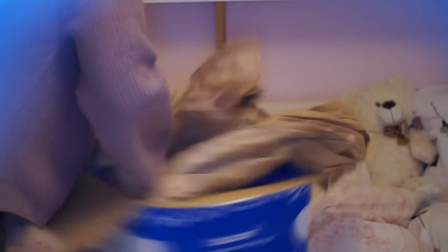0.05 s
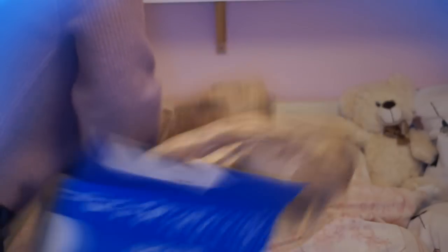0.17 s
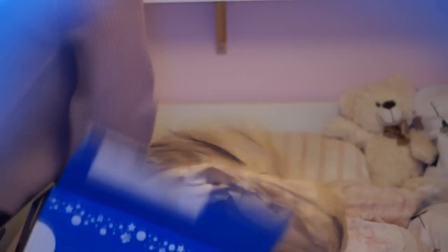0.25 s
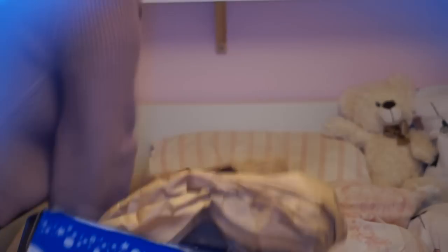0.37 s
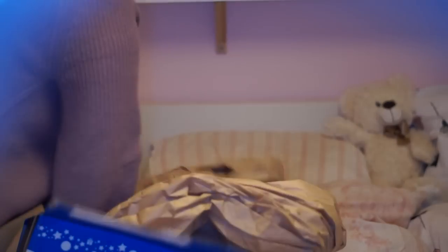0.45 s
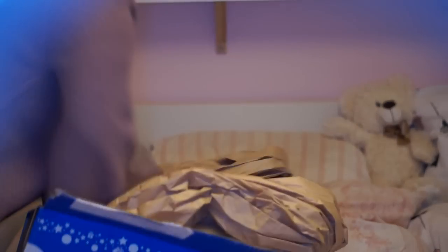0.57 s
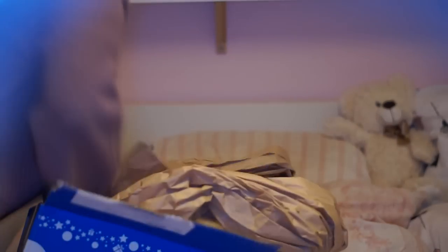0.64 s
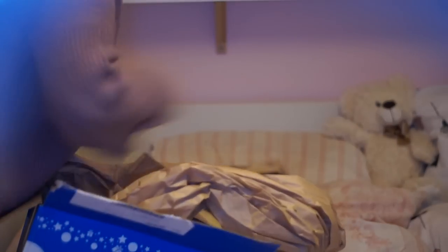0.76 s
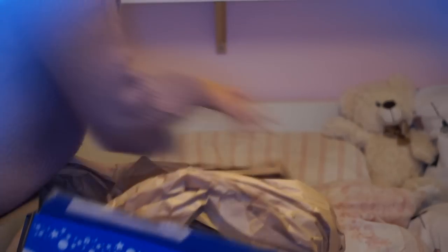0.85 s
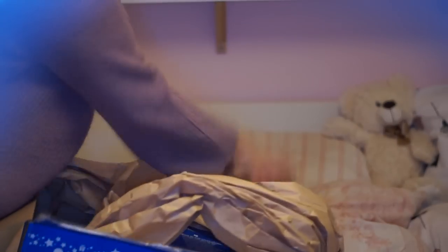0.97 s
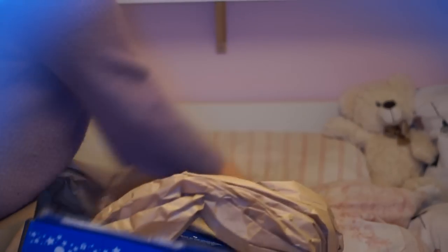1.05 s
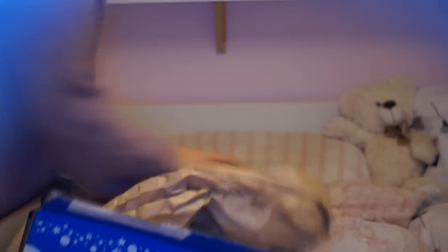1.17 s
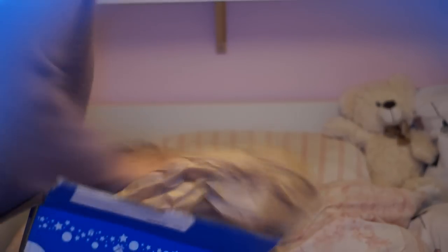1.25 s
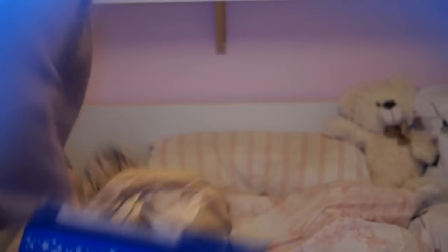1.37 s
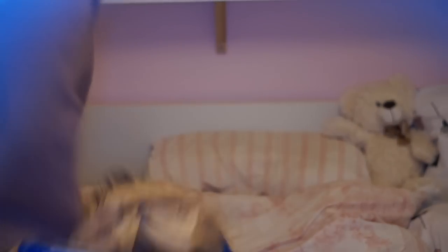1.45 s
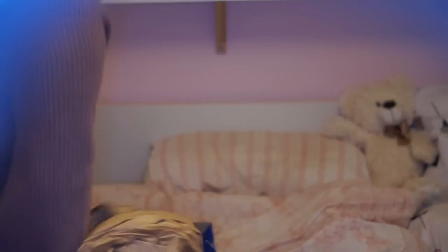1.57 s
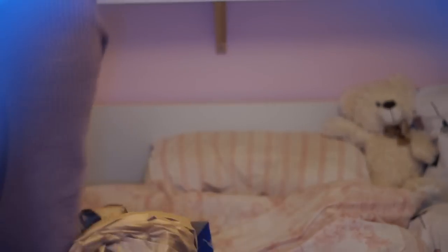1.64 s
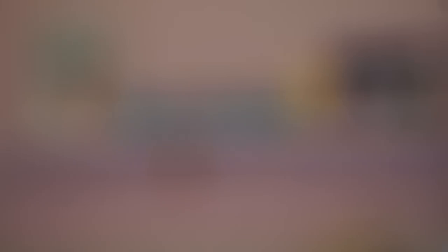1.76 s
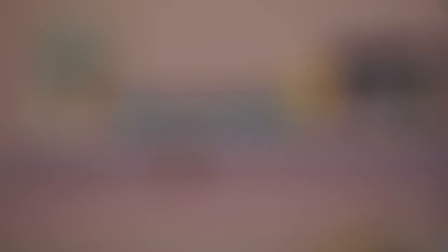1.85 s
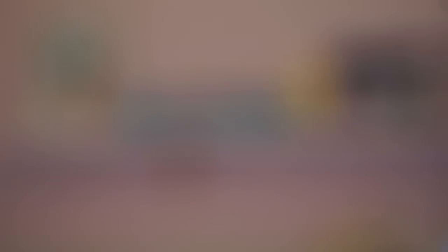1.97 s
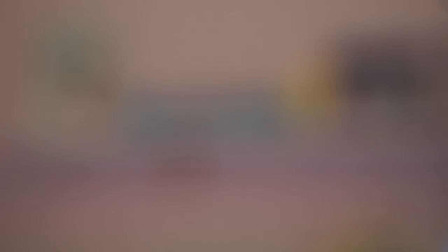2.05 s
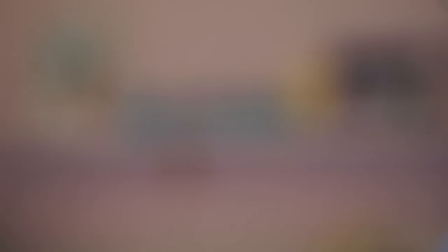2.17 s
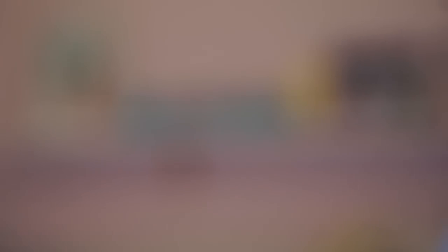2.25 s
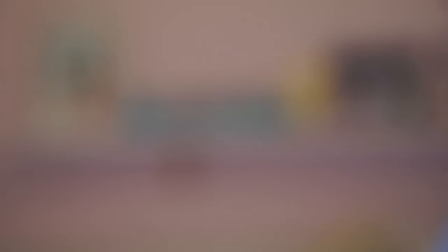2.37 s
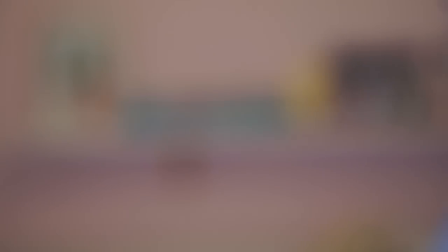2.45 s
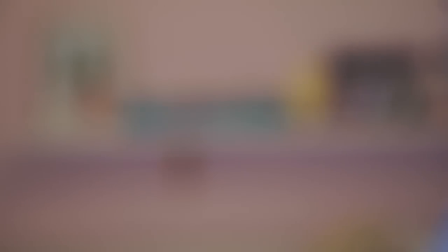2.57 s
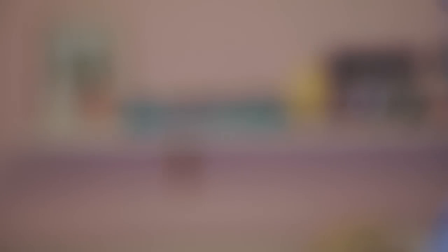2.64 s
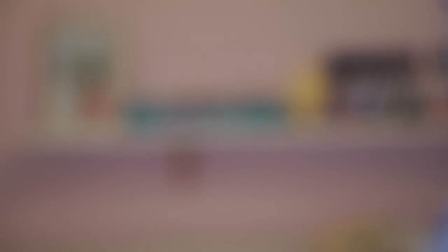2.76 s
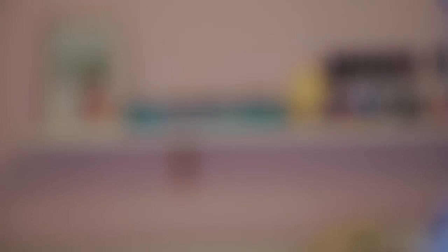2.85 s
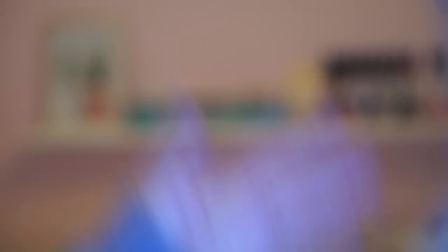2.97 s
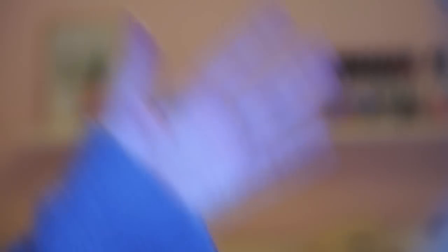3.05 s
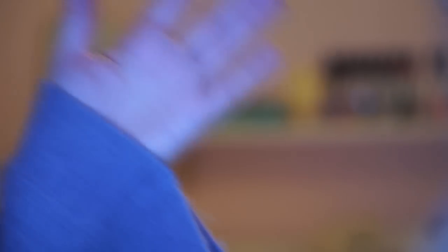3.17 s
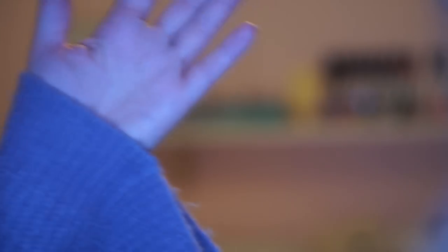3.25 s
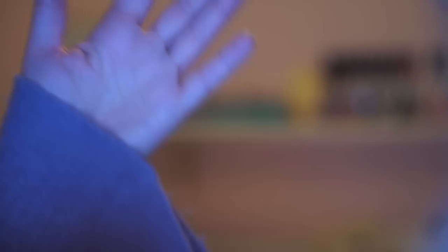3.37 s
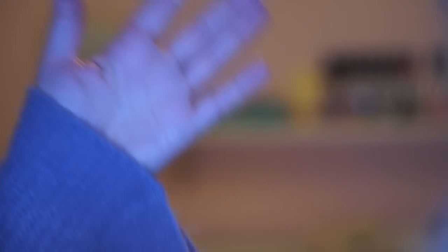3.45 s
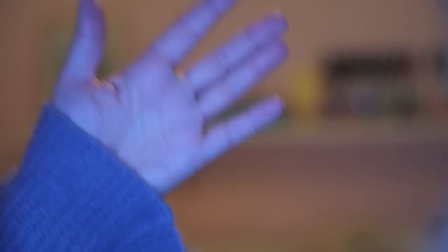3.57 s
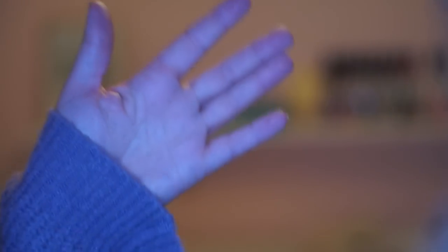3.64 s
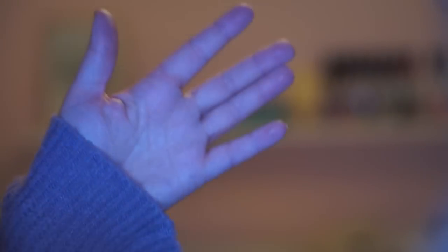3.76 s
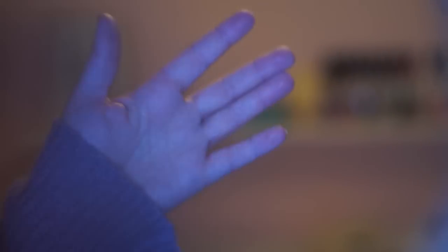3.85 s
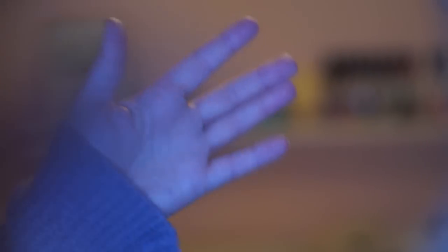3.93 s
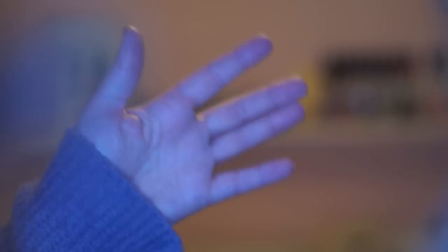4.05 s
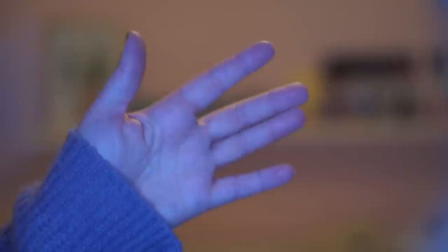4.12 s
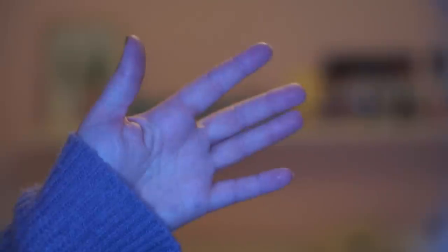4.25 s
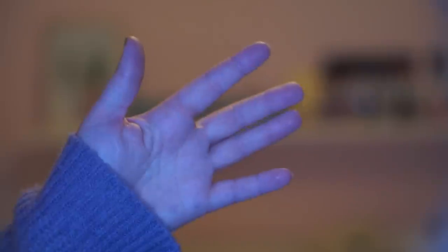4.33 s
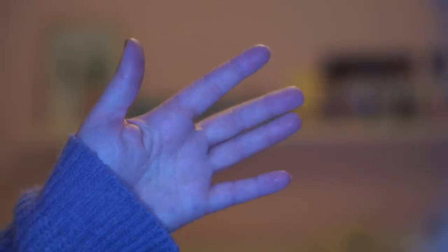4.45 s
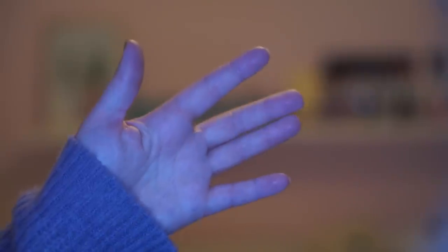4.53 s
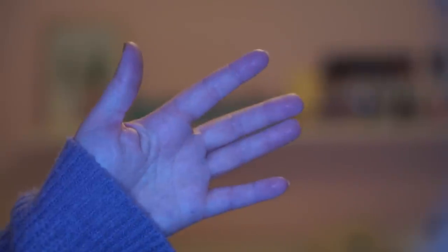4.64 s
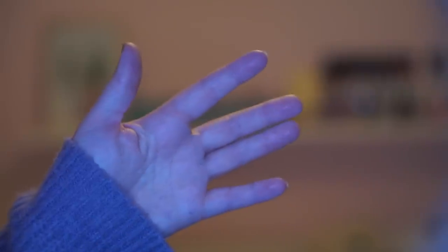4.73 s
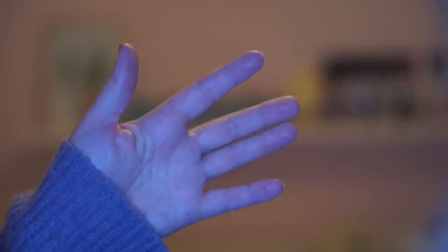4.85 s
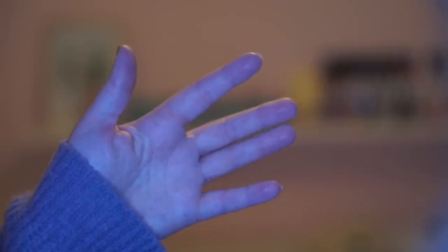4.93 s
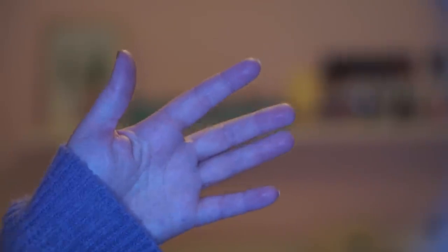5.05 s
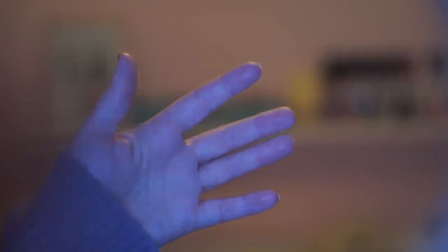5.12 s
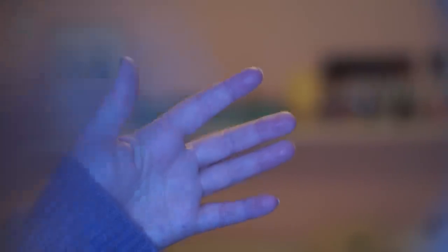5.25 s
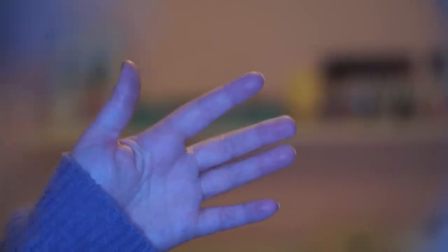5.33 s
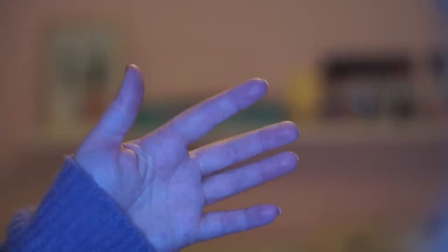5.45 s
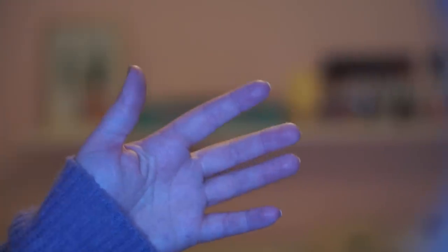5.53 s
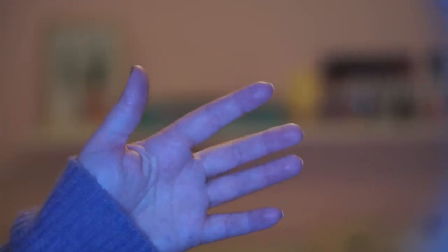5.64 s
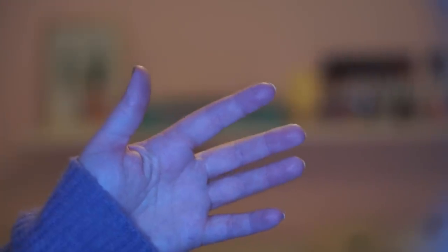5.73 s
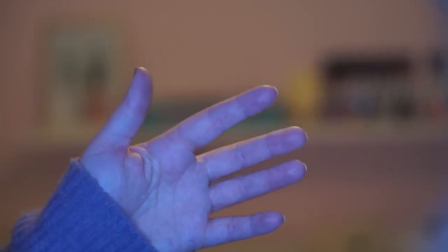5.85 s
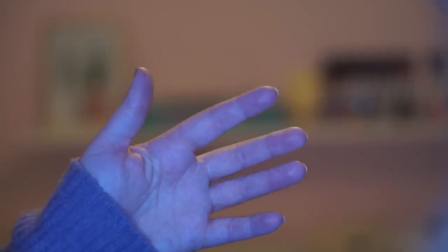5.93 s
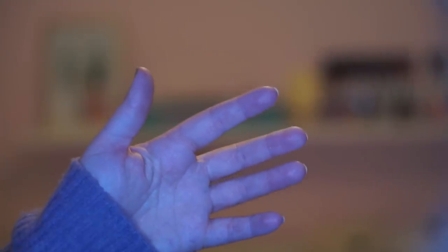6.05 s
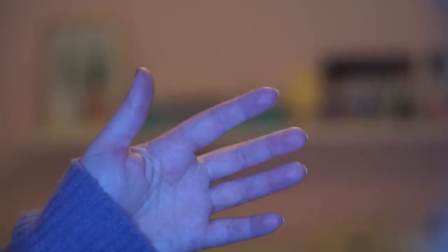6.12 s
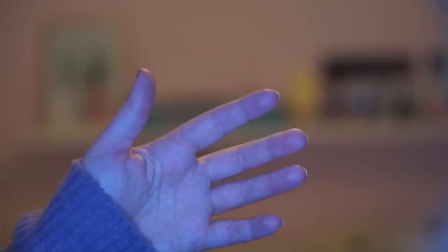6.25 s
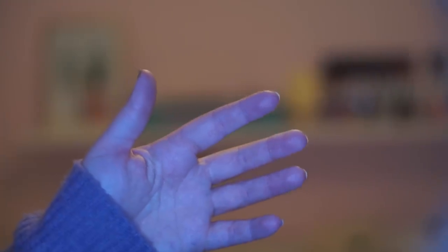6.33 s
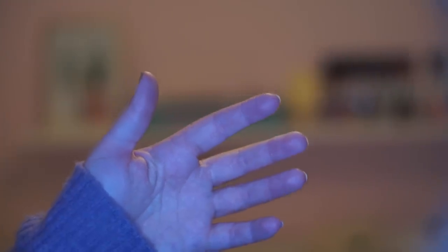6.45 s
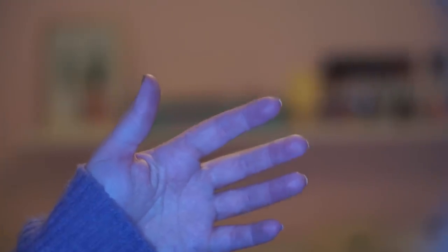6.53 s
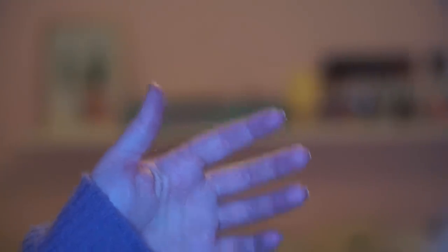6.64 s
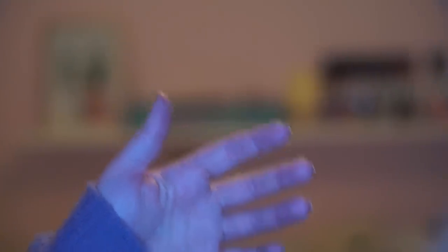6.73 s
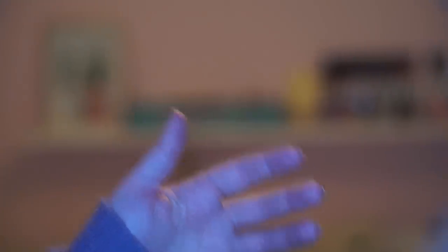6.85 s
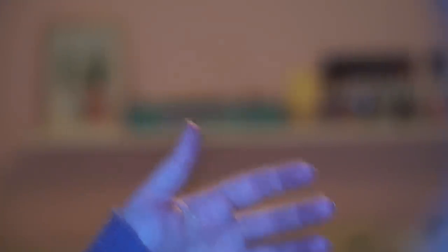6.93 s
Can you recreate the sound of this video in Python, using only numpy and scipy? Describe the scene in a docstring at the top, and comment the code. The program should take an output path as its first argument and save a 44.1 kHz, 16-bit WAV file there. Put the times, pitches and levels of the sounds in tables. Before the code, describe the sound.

From the start, stiff packing paper is pushed about in a cardboard box, close and loud: dense, grainy crackling with crisp snaps, strongest until about 0.3 s. At 0.35 s the box lands with a short, dull, hollow bump. The rustling then eases into smaller crackles, with brief pushes around 0.7 s and a near lull at 0.9 s, before swelling into heavy crunches at 1.2 to 1.6 s. At 1.7 s it is cut dead. Only faint, steady room air with a soft whirr remains, far quieter. Tiny double plastic ticks follow at about 1.75, 2.2, 2.8 and 3.1 s, clearer at 3.85 s and clearest at 6.1 s. Light, raspy finger strokes on the camera shell come at 2.4 to 2.9, 3.4 to 3.8, 4.2 to 4.8 and 5.5 to 6.8 s, with barely audible muffled shuffles near 3, 4, 5.2 and 6.7 s.

```python
"""In a small room, crumpled packing paper is shoved about in a cardboard box: clumps of clicks make the rustle,
short noise bursts the snapping folds. The box lands once with a dull bump, made of ringing panels.
The rustle is cut short. Fingers then rub and tick on a camera: strokes swell a stream of tiny slips,
and double ticks ring its plastic shell. Faint room tone, filtered noise with a soft whirr, runs throughout,
with a few muffled noise swells later on."""
import sys
import numpy as np
from scipy import signal
from scipy.fft import rfft, irfft
from scipy.io import wavfile
from scipy.ndimage import uniform_filter1d

SR = 44100
rng = np.random.default_rng(int(sys.argv[2]) if len(sys.argv) > 2 else 0)


def wav_record(signal):
    """Record a signal, one row per channel, as 16-bit PCM in the file named by sys.argv[1]."""
    frames = np.transpose(np.atleast_2d(signal))
    bounded = np.clip(frames, -1, 1)
    # unit amplitude maps onto the largest positive 16-bit level
    quanta = np.round(bounded * 32767).astype(np.int16)
    wavfile.write(sys.argv[1], SR, quanta)


N = 308300  # samples
T = np.arange(N) / SR  # seconds
HZ = np.fft.rfftfreq(N, 1 / SR)


def amp(db):
    """Turns decibels into a gain."""
    return 10 ** (np.asarray(db) / 20)


def unit(x):
    """Scales a sound to an rms of 1."""
    return x / np.sqrt(np.mean(x ** 2) + 1e-20)


def read(points, hz):
    """Reads a table between its points, on a log-frequency axis."""
    f, value = np.transpose(points)
    return np.interp(np.log(hz + 1), np.log(f + 1), value)


def add(mix, s, sound):
    """Mixes a stereo sound in at time s (seconds)."""
    part = mix[:, max(round(s * SR), 0):][:, :sound.shape[1]]
    part += sound[:, :part.shape[1]]


def colour(x, gain):
    """Filters by one gain per frequency, then scales to an rms of 1."""
    return unit(irfft(rfft(x) * gain, x.shape[-1]))


def ring(x, hz, width):
    """Passes a sound through one resonance with a gain of 1 at its peak."""
    return signal.lfilter(*signal.iirpeak(min(hz, SR / 3), hz / min(width, SR / 3), SR), x)


def struck(t, hz, width):
    """One struck mode: a sine that dies away, faster for a wider resonance."""
    return np.exp(-np.pi * width * t) * np.sin(2 * np.pi * hz * t)


def above(x, hz):
    """Steep high-pass: small things radiate no deep bass."""
    return signal.sosfilt(signal.butter(3, hz, "high", fs=SR, output="sos"), x)


def paired(x, likeness):
    """Blends two unrelated channels until they are as alike as a close pair of microphones hears them."""
    a, b = rfft(x)
    same = np.clip(read(likeness, np.fft.rfftfreq(x.shape[1], 1 / SR)), -1, 1)
    mid = a * np.sqrt(1 + same)
    side = b * np.sqrt(1 - same)
    return irfft(np.array([mid + side, mid - side]), x.shape[1]) / np.sqrt(2)


def lean(x, left_db):
    """Tips a sound towards the left."""
    return x * amp([[left_db / 2], [-left_db / 2]])


def flutter(seconds):
    """Smooth random wander of rms 1 that changes on this time scale."""
    return colour(rng.standard_normal(N), np.exp(-(HZ * seconds) ** 2))


def crackle(per_s, spread_db):
    """Sparse clicks of either sign, mostly small and a few large."""
    size = amp(spread_db * np.minimum(rng.exponential(1, N), 4))
    happens = rng.random(N) < per_s / SR
    swing = np.sin(2 * np.pi * rng.random((2, N)))  # differs left and right
    return unit(size * happens * swing)


def shifting(x, depth_db, frames, bins):
    """Random patches of time and frequency grow louder and softer: a grainy, slightly pitched texture."""
    z = signal.stft(x, nperseg=1024, noverlap=768)[2]
    patches = rng.standard_normal(z.shape[:0:-1])
    patches = uniform_filter1d(patches, frames, axis=0)
    patches = uniform_filter1d(patches, bins, axis=1)
    return signal.istft(z * amp(depth_db * unit(patches).T), nperseg=1024, noverlap=768)[1][:, :N]


# How long the room's echo lasts. Each row: frequency in Hz, time to fall by 60 dB in seconds.
ECHO_TIME = [(150, 0.17), (1000, 0.26), (4000, 0.26), (14000, .14)]


def room(x, wet_db):
    """Adds a short noise-like tail that dies sooner in the bass and the top than in the middle."""
    hz, t, z = signal.stft(rng.standard_normal((2, SR // 2)), SR, nperseg=256)
    fall = amp(-60 * t / read(ECHO_TIME, hz)[:, None])
    tail = signal.istft(z * fall, SR, nperseg=256)[1]
    tail[:, :SR // 250] = 0  # no echo in the first 4 ms
    tail = tail / np.linalg.norm(tail[0])
    return x + amp(wet_db) * signal.fftconvolve(x, tail, axes=1)[:, :N]


# Colour of the room's air. Each row: frequency in Hz, relative level in dB per Hz.
AIR_COLOUR = [(25, -48.5), (60, -40.5), (110, -25.5), (170, -25.5), (220, -14.5), (350, -12), (526, -6.5),
              (801, -6.5), (1190, -4.5), (1810, -5.5), (2120, -4.5), (4080, -13), (6550, -16.5),
              (13000, -18), (16000, -23)]
# The soft whirr. Each row: resonance in Hz, width in Hz, average gain in dB.
WHIRR_TONES = [(2070, 100, 1), (1230, 140, -3), (539, 100, -16)]
# Likeness of left and right for air and handling. Each row: frequency in Hz, likeness (1 is identical).
NEAR_LIKENESS = [(100, 1), (600, 0.27), (2000, 0.23), (4000, 0.11), (12000, 0.11)]


def room_tone():
    """Faint noise shaped like room air, with a soft whirr of wavering resonances in it."""
    air = colour(paired(rng.standard_normal((2, N)), NEAR_LIKENESS), amp(read(AIR_COLOUR, HZ)))
    whirr = sum(amp(db + 1.5 * flutter(0.2)) * ring(air, hz, width) for hz, width, db in WHIRR_TONES)
    return amp(-60.04) * unit(air + whirr) * amp(0.5 * flutter(0.17))


def shove(start, rise, hold):
    """The hand speeds up, keeps pushing, then the wad comes to rest ever faster."""
    after = np.maximum(T - start - rise - hold, 0)
    settling = amp(-81 * after - 1102 * after ** 2)  # dB per s, dB per s squared
    return np.clip((T - start) / rise, 0, 1) * settling


# Colour of the paper, before its four size ranges are balanced.
# Each row: frequency in Hz, relative level in dB per Hz.
PAPER_COLOUR = [(24, -70.5), (40, -41), (180, -30.5), (220, -19), (312, -15.5), (392, -6), (615, -6),
                (770, -3), (965, -6), (1270, -1), (1410, -4), (2500, -0.5), (7360, -11), (14800, -16.5),
                (16000, -18.5)]
# Hollows of box and paper that resonate. Each row: frequency in Hz, width in Hz, strength in dB
# before all are scaled by 0.43.
HOLLOWS = [(274, 40, 0), (390, 45, 0.5), (410, 22, -6.5), (463, 18, 0), (756, 50, 1), (1036, 47, 0.5),
           (1173, 48, -3), (1264, 43, 0.5), (1593, 32, 7), (1717, 25, -1), (2848, 48, -10), (3193, 25, 2),
           (4435, 28, -8)]
# Likeness of left and right for the paper. Each row: frequency in Hz, likeness (1 is identical).
PAPER_LIKENESS = [(100, 1), (500, 0.89), (1000, 0.78), (2000, 0.74), (4000, 0.11), (8000, 0.19),
                  (14000, .27)]
# Shoves of the paper. Each row: start in seconds, rise in seconds, hold in seconds, level in dB, then
# in dB against that level the bulk of the wad, crunch of creases and crisp fizz, all before the balance below.
PUSHES = [(-.04, 0.04, 0.1, -20.5, -4.5, 0, 0), (0.072, 0.072, 0.076, -19.5, -3, 1.5, 0),
          (0.221, 0.073, 0.044, -18, 0.5, -1, 1), (0.378, .03, 0.039, -28, 1, 0, -4),
          (0.454, 0.12, 0.08, -30, -2.5, -4, -3.5), (0.686, .025, 0.011, -27.7, -2, -0.5, -1),
          (0.719, 0.029, 0.018, -27, -2.5, 4.5, -0.5), (0.914, 0.025, .02, -65, 7, -15, 8),
          (0.982, 0.1, 0.0053, -21, -5, 0.5, 0.5), (1.104, 0.035, 0.06, -25, -5, 1.5, 1.5),
          (1.157, 0.19, 0.02, -17, -3.5, 0.5, 2.1), (1.37, 0.12, 0.08, -22, -0.5, -1.8, -.8),
          (1.582, 0.022, 0.062, -24.5, -1, -2.5, -3)]
BULK_DB, BODY_DB, CRUNCH_DB, FIZZ_DB = -13, -1.63, -8, -9  # balance of facets from large to small
LOOSE_DB = -45  # loose sheets keep stirring between shoves; before the balance
JOLT_DB, JOLT_S = -4, 0.012  # a knock of the box shakes the wad: dB against the knock, seconds


def rustle():
    """Facets of every size crackle in clumps; each shove sets how deep, crunchy and crisp they sound."""
    sheets = np.zeros((2, N))
    for hz in np.geomspace(300, 14000, num=10):
        clumps = amp(1.8 * flutter(0.03))
        facets = ring(crackle(2000, 2.83) * clumps, hz, hz * 1.13)
        sheets += room(unit(facets), -3.5)
    sheets = shifting(sheets, depth_db=2.1, frames=6, bins=4)
    # flatten the broad spectrum, then give it the paper's colour with the hollows standing out
    broad = np.sqrt(uniform_filter1d((abs(rfft(sheets)) ** 2).mean(0), size=1000))
    hollows = 1 + sum(0.43 * amp(db) / (1 + ((HZ - hz) / (width / 2)) ** 2) for hz, width, db in HOLLOWS)
    paper = colour(sheets, amp(read(PAPER_COLOUR, HZ)) * hollows / broad)
    z = rfft(paired(paper, PAPER_LIKENESS))
    # four ranges of facet size, all stirred by the same shoves
    below = [0] + [1 / (1 + (HZ / hz) ** 8) for hz in (650, 3400, 5900)] + [1]
    bulk, body, crunch, fizz = (unit(irfft(z * (hi - lo), N)) for lo, hi in zip(below, below[1:]))
    pushes = np.array([amp(db) * shove(start, rise, hold) for start, rise, hold, db, *_ in PUSHES])
    motion = np.hypot(np.linalg.norm(pushes, axis=0), amp(LOOSE_DB))
    shares = amp(np.array(PUSHES)[:, -3:].T)
    heave, crush, crisp = np.sqrt(shares ** 2 @ pushes ** 2 + amp(LOOSE_DB - 4) ** 2)
    jolt = sum(amp(db + JOLT_DB) * np.exp(-abs(T - s) / JOLT_S) for s, db in KNOCKS)
    return (np.hypot(amp(BULK_DB) * heave, jolt) * bulk + amp(BODY_DB) * motion * body
            + amp(CRUNCH_DB) * crush * crunch + amp(FIZZ_DB) * crisp * fizz)


# Folds that buckle loudly. Each row: start in seconds, peak in dB before room and high-pass, centre in Hz.
FOLDS = [(.003, -13.5, 2143), (0.131, -15.5, 6950), (0.455, -26, 4000), (0.532, -25, 5000),
         (0.588, -21, 3000), (0.623, -28, 2200), (.638, -19.5, 2190), (0.713, -17.5, 8000),
         (0.925, -31, 8600), (.946, -47.5, 8440), (1.004, -25.5, 2300), (1.083, -18, 2540),
         (1.2, -10.5, 2440), (1.299, -14.5, 2010), (1.535, -9.5, 1570), (1.635, -15.5, 910)]


def snaps():
    """A buckling fold lets go in a quick burst of band-limited noise."""
    out = np.zeros((2, N))
    t = np.arange(SR // 16) / SR
    for s, db, hz in FOLDS:
        burst = rng.standard_normal((2, len(t))) * amp(-60 * t / 0.036)  # falls 60 dB in 36 ms
        burst = ring(burst, hz, hz * 1.5)
        burst = ring(burst, hz, hz * 3.8)
        add(out, s, amp(db) * burst / abs(burst).max())
    return paired(above(room(out, -1), 440), PAPER_LIKENESS)


# The box lands and rocks. Each row: start in seconds, peak in dB before room and high-pass.
KNOCKS = [(0.34, -27.5), (0.348, -18.5), (0.37, -35.5)]
# The cardboard panels. Each row: lowest ring in Hz (up to 5% higher by chance), width in Hz, level in dB.
PANELS = [(139, 62, -10.5), (262, 41, 0.5), (454, 75, 1.5), (753, 150, 8)]


def bumps():
    """Each knock rings the cardboard panels briefly as a sum of dying sines."""
    out = np.zeros((2, N))
    t = np.arange(SR // 4) / SR
    for s, db in KNOCKS:
        knock = 0
        for hz, width, mode_db in PANELS:
            mode = struck(t, hz * rng.uniform(1.0, 1.05), width)
            knock = knock + amp(mode_db) * ring(mode, hz, hz)
        add(out, s, amp(db) * np.array([knock, knock]) / abs(knock).max())
    return above(room(out, -18.5), 150)


# The camera's shell. Each row: resonance in Hz (shifted a little by chance), width in Hz, level in dB.
SHELL_MODES = [(600, 320, 5), (772, 480, 6.5), (1000, 460, 7), (1960, 97, -5), (2123, 190, 4),
               (2660, 440, -0.5), (2840, 350, 1), (3320, 76, -2.5), (3670, 180, 2.5), (4450, 164, -3.5)]


def tick(main_hz, fall_db, t60):
    """A sharp contact and a short chatter ring the shell; where it is touched decides which mode leads."""
    t = np.arange(SR // 6) / SR
    blow = 0.095 * paired(rng.standard_normal((2, len(t))), NEAR_LIKENESS) * amp(-60 * t / t60)
    blow[:, 0] += 1  # the contact itself
    shell = 0
    for hz, width, mode_db in SHELL_MODES:
        mode = ring(struck(t, hz * rng.uniform(0.887, 1.015), width), hz, hz * 0.096)
        shell = shell + amp(mode_db - fall_db * abs(np.log2(hz / main_hz))) * mode
    body = unit(signal.fftconvolve(blow, shell[None], axes=1)[:, :len(t)])
    contact = unit(ring(blow, 2800, 6100))
    sound = above(body + amp(-17.5) * contact, main_hz * 0.29)
    # the whole camera is jogged too, less so for higher ticks
    thud = amp(-35 - 12 * np.log2(main_hz / 1000)) * struck(t, 110.6, 260)
    return sound / abs(sound).max() + thud


# Double ticks on the camera. Each row: start in seconds, peak in dB before thud and room, main ring in Hz,
# fall of the other modes in dB per octave, chatter's 60 dB fall in seconds, second tick's delay in seconds,
# its level in dB against the first, its chatter's 60 dB fall in seconds.
DOUBLE_TICKS = [(1.747, -39, 1100, 5.5, .2, .017, -1, 0.18), (2.222, -37.5, 1600, 12, 0.041, .01, -6, .06),
                (2.781, -39.5, 3580, 30, .15, .024, 7.5, .028),
                (3.06, -33.5, 3770, 22.5, 0.033, 0.023, -8, 0.056),
                (3.849, -25.5, 1200, 15, 0.03, .014, -6, .11),
                (4.757, -39, 2960, 1, 0.028, .024, -1.5, 0.064),
                (6.074, -22, 2270, 9, 0.04, .021, -8, 0.064),
                (6.226, -48.5, 800, 24, 0.041, .02, -8, 0.054), (6.438, -50, 850, 35, .06, .015, -7, .05),
                (6.664, -50, 3200, 26, .025, .03, 4, .03), (6.805, -46.5, 3630, 24, .045, .014, 6.5, .03)]


def ticks():
    """Each tick is double: a press, then a release 10 to 30 ms later, softer or louder."""
    out = np.zeros((2, N))
    for s, db, main_hz, fall_db, press_t60, delay, release_db, release_t60 in DOUBLE_TICKS:
        add(out, s, amp(db) * tick(main_hz, fall_db, press_t60))
        add(out, s + delay, amp(db + release_db) * tick(main_hz, fall_db, release_t60))
    return room(out, -15)


# Colour of the rasp. Each row: frequency in Hz, relative level in dB per Hz.
RASP_COLOUR = [(900, -22), (1600, -13), (1900, 6), (2400, 1), (2800, 6), (3150, -3), (3600, -6.5),
               (4200, -4.5), (5100, -17.5), (7000, -20), (10000, -24)]
# Resonances of the rasp. Each row: frequency in Hz, width in Hz, level in dB before a gain of 2.1.
RASP_RINGS = [(2300, 100, 3), (3500, 110, 1)]
# Colour of the skin hiss. Each row: frequency in Hz, relative level in dB per Hz.
HISS_COLOUR = [(2940, -59), (5000, -9), (7900, -14), (9460, 0.5), (11100, 0.5), (12300, 4), (13400, 3),
               (14900, -1), (16000, -5)]
# Finger strokes. Each row: peak in seconds, swell in seconds, fade in seconds, rasp in dB, skin hiss in dB
# (before a 0.7 dB cut), dB by which the shell rings low rather than high.
FINGER_STROKES = [(2.44, 0.034, 0.022, -52.5, -59.5, 2), (2.645, 0.018, 0.023, -59, -66, -12),
                  (2.732, .012, .015, -56, -80, -20), (2.794, 0.021, .016, -54, -69, -16),
                  (2.93, 0.084, .12, -64.5, -83, -8), (3.42, 0.027, .04, -69, -66, -4),
                  (3.61, 0.022, 0.034, -53, -58.5, -13), (3.774, 0.019, 0.016, -54.5, -68, -9),
                  (4.26, 0.12, 0.067, -55, -66, 3), (4.36, 0.087, .085, -54, -51, -11),
                  (4.504, 0.061, .028, -53.5, -56, -9), (4.625, 0.011, .03, -61, -59.5, -1),
                  (4.78, 0.043, 0.029, -53, -58, 1), (5.54, 0.044, 0.083, -58.5, -61.5, 0),
                  (5.739, 0.1, .05, -55.5, -55, 3), (5.85, .06, 0.029, -51, -54.5, 14),
                  (5.92, 0.06, 0.052, -51, -49.5, -5), (6.045, 0.023, 0.052, -57.5, -60, -8),
                  (6.34, 0.03, 0.034, -53, -60.5, -1), (6.425, 0.036, .025, -56, -65, 3),
                  (6.485, .035, 0.041, -58, -61, -1.5), (6.581, 0.028, .025, -61.5, -63.5, -10),
                  (6.66, 0.027, 0.033, -57.5, -61, -3), (6.82, .02, .025, -59.5, -63, -6)]


def slides():
    """Tiny slips of skin on plastic: shell rasp and fine contact hiss swell and fade with each stroke."""
    slips = above(paired(crackle(5000, 0.5), NEAR_LIKENESS), 500) * amp(0.5 * flutter(0.0091))
    slips = shifting(slips, depth_db=3.5, frames=22, bins=5)
    rasp = colour(slips, amp(read(RASP_COLOUR, HZ)))
    rasp = rasp + 2.1 * sum(amp(db) * ring(rasp, hz, width) for hz, width, db in RASP_RINGS)
    hiss = colour(slips, amp(read(HISS_COLOUR, HZ)))
    low = 1 / (1 + (HZ / 3050) ** 20)  # splits the rasp at 3050 Hz
    power = np.zeros((3, N))
    for s, swell, fade, rasp_db, hiss_db, grip_db in FINGER_STROKES:
        envelope = np.exp(-((T - s) / np.where(T < s, swell, fade)) ** 2)
        high = amp(rasp_db) / np.hypot(1, amp(grip_db))
        power += np.outer([(high * amp(grip_db)) ** 2, high ** 2, amp(hiss_db) ** 2], envelope)
    low_gain, high_gain, hiss_gain = np.sqrt(power)
    rasp = low_gain * colour(rasp, low) + high_gain * colour(rasp, 1 - low)
    return rasp + amp(-0.7) * hiss_gain * hiss


# Faint soft shuffles. Each row: middle in seconds, length in seconds, level in dB before the swell,
# centre in Hz, width in Hz.
SOFT_SHUFFLES = [(3.055, 0.47, -62, 1470, 700), (3.208, 0.13, -63.5, 550, 90), (3.94, 0.39, -62, 620, 350),
                 (3.961, 0.28, -63.5, 1350, 596), (5.188, 0.18, -64.5, 930, 500),
                 (5.868, 0.22, -71.5, 850, 400), (6.699, 0.4, -65, 930, 600)]


def shuffles():
    """Each is a soft swell of muffled noise."""
    out = np.zeros((2, N))
    for s, length, db, hz, width in SOFT_SHUFFLES:
        noise = paired(rng.standard_normal((2, round(length * SR))), NEAR_LIKENESS)
        muffled = unit(ring(ring(noise, hz, width), hz, width))
        add(out, s - length / 2, amp(db) * muffled * np.hanning(noise.shape[1]))
    return out


STOP_S = 1.703  # the paper and box are cut short here


def scene():
    """The paper and its box until the sudden stop, then small handling sounds, over one room tone."""
    moving = np.clip((STOP_S - T) / 0.008, 0, 1)
    dying = amp(-10 - 1450 * np.maximum(T - STOP_S, 0))  # a last very quick fall
    paper = np.maximum(moving, dying) * (lean(rustle() + snaps(), 1.7) + bumps())
    handling = lean(ticks(), 1.5) + lean(slides(), 2.0)
    return paper + handling + lean(room_tone() + shuffles(), 1.9)


def record(dry):
    """Removes everything above about 15.9 kHz with a steep low-pass."""
    lowpass = signal.firwin(511, 15900, window=("kaiser", 9), fs=SR)
    return signal.oaconvolve(dry, lowpass[None], "same")


dry = scene()
out = record(dry)
wav_record(out)
```